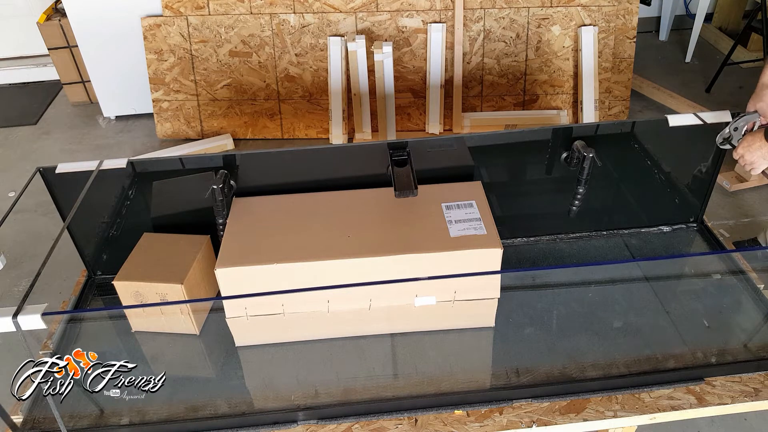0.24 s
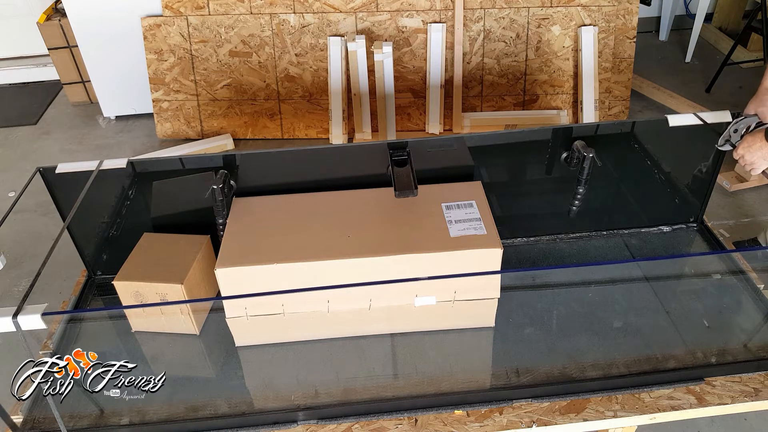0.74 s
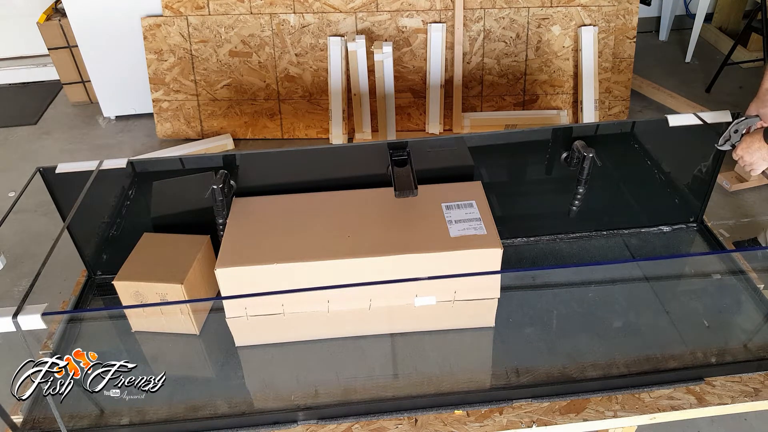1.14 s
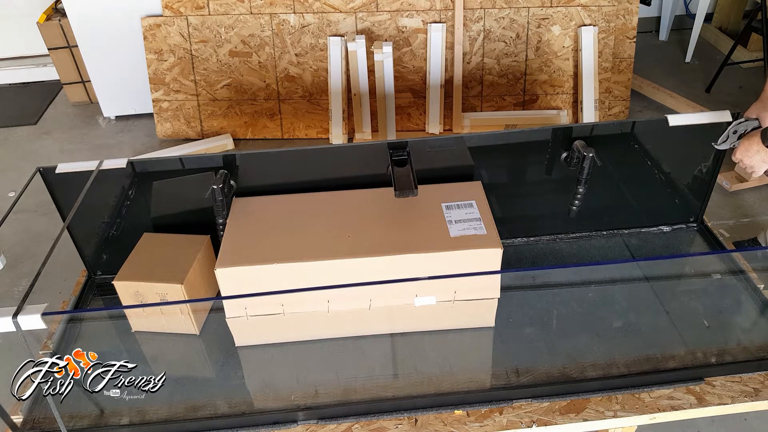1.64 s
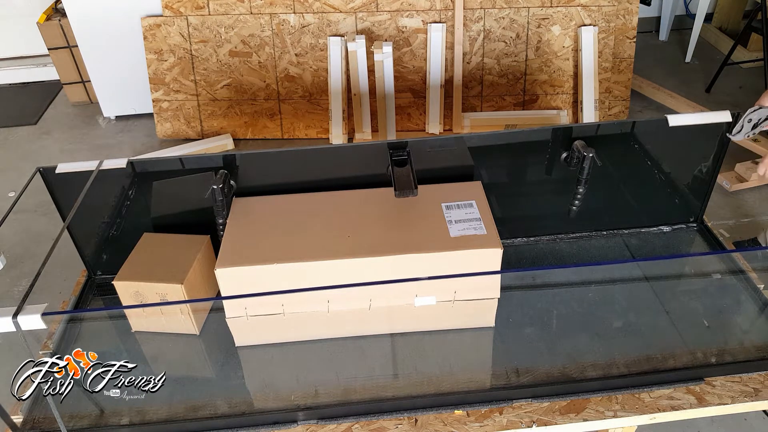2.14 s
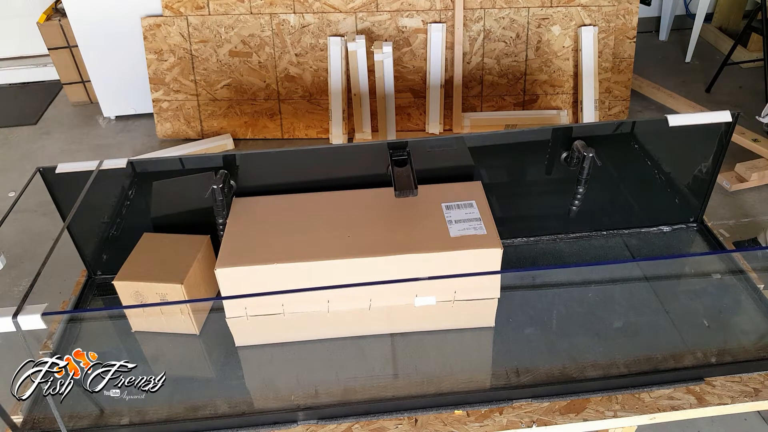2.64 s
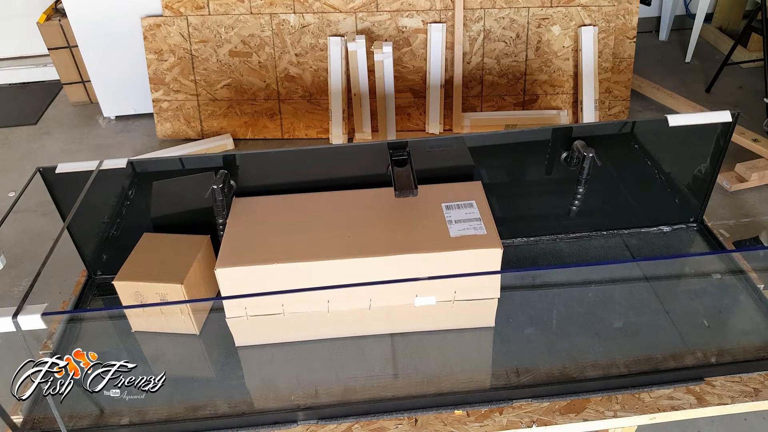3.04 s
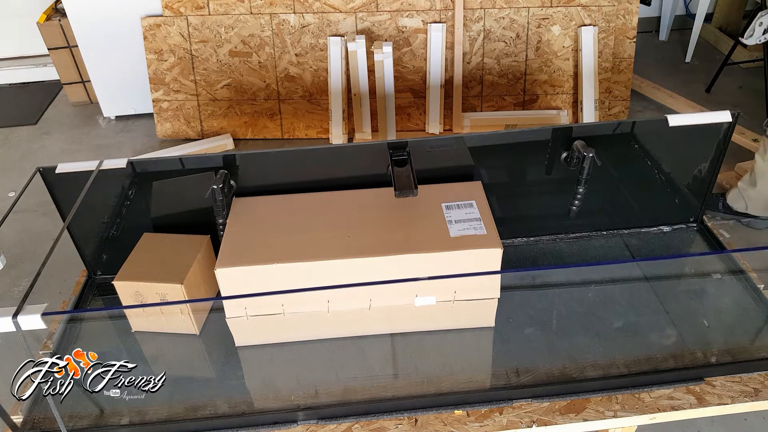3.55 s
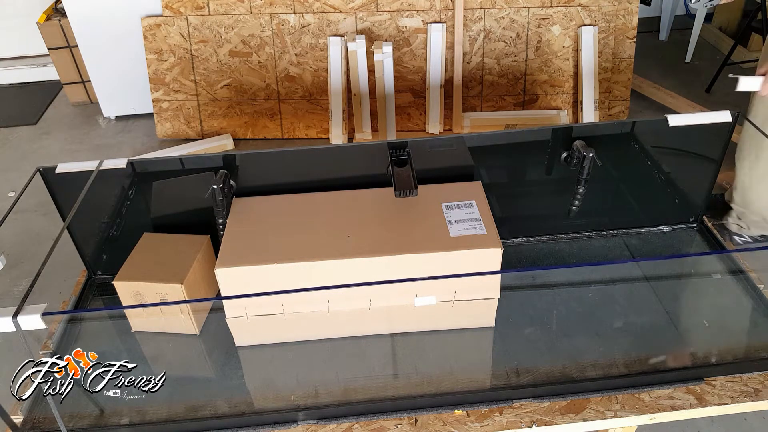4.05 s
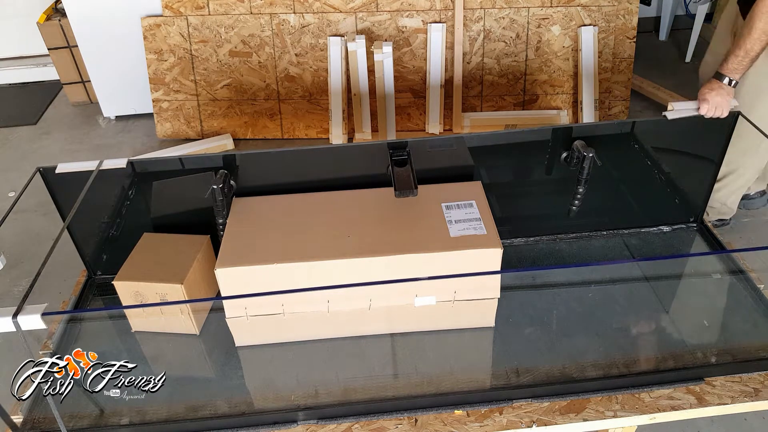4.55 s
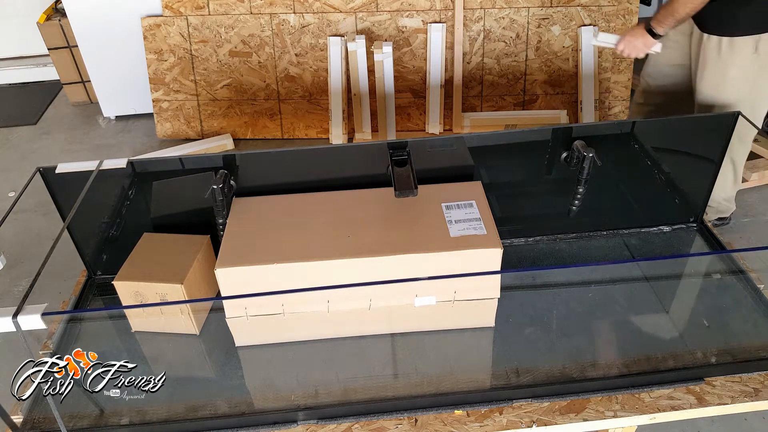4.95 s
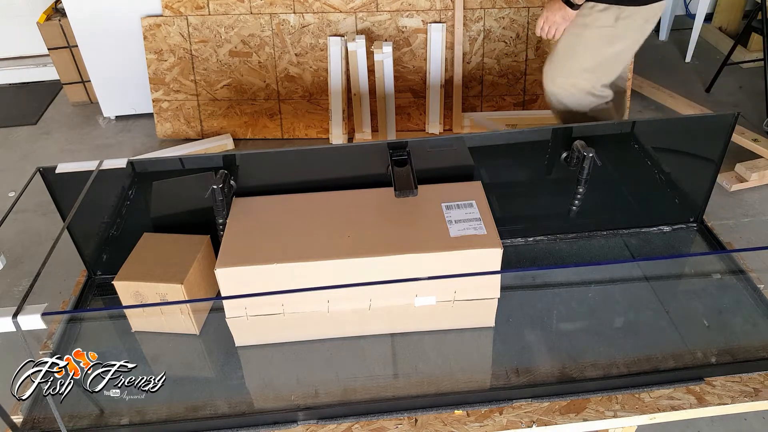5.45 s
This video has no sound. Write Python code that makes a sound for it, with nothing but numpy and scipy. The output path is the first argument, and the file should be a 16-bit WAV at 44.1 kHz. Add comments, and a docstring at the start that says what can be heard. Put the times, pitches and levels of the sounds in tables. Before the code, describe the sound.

In a garage with faint hum and short reverberation, a hand tool makes three sharp, steely snaps about half a second apart. A large panel then cracks and booms onto the floor slightly right, bouncing quickly and ringing low. Faint shoe and cloth scuffs, gritty ticks and dull knocks follow, before a small board lands with a hard, ringing clatter. Stereo microphone at moderate distance.

```python
"""A hand tool snaps three times on wooden boards in a garage, over still air and mains hum.
Then a big panel drops, a little to the right: noise bursts crack and boom, bending modes ring on.
Shoes and clothes scuff as shaped noise, sharp ticks and grit speckle it, and dull knocks follow.
A small board is thrown down and clatters on the concrete: softened bursts with a ring of its own.
Bands of decaying noise give the contacts the room's reverberation."""
import sys
import numpy as np
from scipy import signal
from scipy.fft import rfft, irfft, next_fast_len
from scipy.io import wavfile
from scipy.ndimage import uniform_filter1d

SR = 44100
rng = np.random.default_rng(int(sys.argv[2]) if len(sys.argv) > 2 else 0)


def generate_wav(sig):
    """Save sig (samples, or channels by samples) to the path in sys.argv[1] as 16-bit PCM at SR."""
    pcm = np.round(np.clip(np.atleast_2d(sig).T, -1, 1) * 32767).astype(np.int16)
    wavfile.write(sys.argv[1], SR, pcm)


N = 250488
T = np.arange(N) / SR  # seconds

# Contact levels are set ahead of the garage's direct and room gains; colours and rings are relative.
# Tool snaps: t/s, level/dB, dry thump/dB and wood ring/dB (both relative to the level),
# spring-back level/dB, then low, middle and top ring f/Hz as the grip shifts.
TOOL_SNAPS = [(0.1675, -18.5, -35.5, -16, -42, 4530, 8410, 11300),
              (0.593, -19, -21.5, -36.5, -45.5, 5310, 8010, 11740),
              (1.0323, -17.5, -30.5, -21, -61, 4566, 8010, 11730)]
# Colour of the tool's rasp: f/Hz, level/dB
RASP_COLOUR = [(60, -33.5), (130, -13), (220, -14), (600, -19.5), (2000, -10), (3200, -7.5), (4300, -3),
               (7000, -5), (10500, -1.5), (12000, 1), (13500, -3), (16000, -8)]
# Steady rings of the tool's steel: f/Hz, level/dB
STEEL_RINGS = [(2850, -14.5), (3850, -8), (4400, -10), (5150, -7), (5750, -12), (7000, -7), (9350, -3.5),
               (11750, 2), (12150, -1.5), (12700, -3), (13350, -9), (14600, -4.5)]
# Low, middle and top steel ring that shift with the grip: level/dB
GRIP_RING_LEVELS = [-3, 1, 5.5]
# Rings of the wood under the tool: f/Hz, level/dB, t60/s
WOOD_UNDER_TOOL = [(950, 1, .04), (1099, -6.5, 0.04), (1830, -3, .03)]
# Colour of the tool's thump through the wood: f/Hz, level/dB
TOOL_THUMP_COLOUR = [(40, -16), (130, 2), (700, -2), (2000, -3), (6000, -32.5)]
SPRING_BACK_S = .217  # from each snap to the tool's spring-back

# The panel lands and rebounds: t/s, boom level/dB, crack level/dB
PANEL_LANDINGS = [(1.6649, -24, -7.5), (1.671, -5, -23), (1.696, -13.5, -19.5), (1.712, -11, -21),
                  (1.745, -14, -20.5), (1.764, -13.5, -27), (1.781, -22, -24.5)]
# Bending modes of the panel: f/Hz, level/dB, t60/s
PANEL_BENDING = [(81, -18, 1.0), (129.4, -12, 0.39), (163.6, -7.5, 0.11), (183.9, 1, 0.71),
                 (214.5, -3.5, 0.37), (268.6, -6, 0.68), (324.5, -5, 0.37), (369.7, -12, 0.57),
                 (428, -8.5, 0.6), (479, -5.5, 0.25), (505, -11.5, 0.54), (595, -16.5, .34),
                 (660, -13.5, 0.69), (770, -12, 0.33)]
# Colour of the panel's boom: f/Hz, level/dB
BOOM_COLOUR = [(30, -32), (62, -30.5), (100, -16), (140, -2.5), (190, -5), (280, 1.5), (380, -2), (520, -3),
               (800, -6.5), (1100, -5.5), (1600, -23), (4000, -30.5), (16000, -56.5)]
# Colour of the panel's crack: f/Hz, level/dB
CRACK_COLOUR = [(100, -34), (300, -10), (750, -1.5), (1600, 1), (2200, -1), (3000, 3.5), (5000, -6.5),
                (7300, -11.5), (8700, -5.5), (10300, -14.5), (16000, -18.5)]

# Early knock, landing, close echoes and rattle of the board: t/s, level/dB, brightness (low-pass) f/Hz
BOARD_BURSTS = [(4.702, -39.5, 4400), (5.567, -26.5, 1700), (5.5741, -14, 1420), (5.5795, -7, 2410),
                (5.5850, -20, 9000), (5.5924, -19, 6600), (5.614, -14.5, 2980), (5.646, -15.5, 3880)]
# Colour of the board's clatter: f/Hz, level/dB
CLATTER_COLOUR = [(60, -38), (200, -24.5), (380, -20), (600, -9), (900, -4.5), (1250, 2), (1550, -7.5),
                  (2200, 5.5), (3000, -6), (5500, -5.5), (8500, -1), (10500, -9.5), (16000, -4)]
# Ringing modes of the board: f/Hz, level/dB, t60/s
BOARD_RINGS = [(604, -6, 0.78), (870, -6.5, 0.83), (1250, -43, 0.46), (1905, -2, 0.68), (2251, 4.5, 0.17),
               (2314, 9, 0.28), (2460, -5.5, 1)]

# Footfalls and dull knocks: t/s, level/dB, brightness (low-pass) f/Hz
DULL_KNOCKS = [(2.63, -46.5, 449), (3.13, -47, 1020), (3.57, -52.5, 392), (4.18, -46.5, 2040),
               (4.371, -42.5, 1030), (4.425, -30, 4050), (4.433, -28.5, 2330), (4.563, -35, 2280),
               (4.601, -37.5, 680), (4.63, -38.5, 264), (5.105, -49.5, 620), (5.287, -47.5, 840),
               (5.446, -50, 950)]
# Colour of the knocks: f/Hz, level/dB
DULL_COLOUR = [(50, -25), (110, -6.5), (180, -2), (350, -0.5), (750, -4), (1800, -3.5), (2250, -2),
               (2550, -16), (3000, -4), (3600, -10.5), (7000, -19), (16000, -28)]
KNOCK_RING_SHARE = 0.687  # a harder contact rings higher: ring pitch as a share of its brightness

# Sharp ticks: t/s, level/dB, centre f/Hz
SHARP_TICKS = [(0.065, -49, 3960), (3.262, -57, 10500), (3.533, -53, 7900), (3.5825, -37, 10100),
               (3.691, -49, 7000), (3.922, -41.5, 4500), (4.701, -43.5, 10630)]
# Faint grit while the feet shift: mean level and centre pitch, each tick varies around them
GRIT_PER_S, GRIT_DB, GRIT_HZ = 6.3, -64, 6000
GRIT_FROM_S, GRIT_TO_S = 2.42, 3.5

# Strokes of shoes and clothes: t/s, swell/s, fade/(dB per s), rub level/dB, gritty hiss level/dB
SCUFF_STROKES = [(2.58, .02, 37, -69.5, -74), (3.07, 0.067, 40.5, -55.5, -62.5),
                 (3.34, .06, 58, -61.5, -76), (3.5, 0.013, 45, -61, -67), (3.578, 0.0073, 48, -54, -57.5),
                 (3.915, .006, 53.5, -46.5, -49.5), (4.025, 0.0063, 126, -52, -49),
                 (4.17, 0.067, 132, -49, -54.5), (4.42, 0.0035, 120, -47.5, -61),
                 (4.55, 0.018, 48, -55, -60.5)]
# Colour of rubbing cloth and soles: f/Hz, level/dB
CLOTH_COLOUR = [(300, -12.5), (800, -2.5), (1600, -1), (2800, 4.5), (4000, -6), (6000, -20.5),
                (16000, -44.5)]
# Colour of the gritty hiss: f/Hz, level/dB
GRIT_HISS_COLOUR = [(1500, -22), (4000, 2), (5200, 0), (7000, -3.5), (8500, 2.5), (10300, -8),
                    (13000, -6.5), (16000, -13)]
SCUFF_LENGTH_S, SCUFF_LIFT_S = 0.24, 0.13  # a stroke presses this long, then lifts over this time
SLIDE_S, SLIDE_DB = 1.845, -42.5  # the panel settles in short slides, starting here
SLIDE_GAP_S, SLIDE_GAP_SHARE, SLIDE_LOSS_DB = 0.22, 0.52, 13.5  # each comes sooner and weaker
SLIDE_SWELL_S, SLIDE_FADE_DB_PER_S = 0.031, 85

# Colour of the still air: f/Hz, level/dB
AIR_COLOUR = [(25, -29.5), (45, -15.5), (62, -14.5), (95, -13), (125, -8.5), (200, -12), (400, -15.5),
              (500, -14), (800, -22.5), (1300, -27.5), (3300, -35.5), (6500, -42), (8500, -40),
              (16000, -52.5)]
AIR_DB = -57
# Mains hum: f/Hz, level/dB (RMS)
MAINS_HUM = [(120, -60)]

# Reverberation bands of the garage: f/Hz, t60/s, left-right likeness (0 unrelated, 1 identical)
GARAGE_BANDS = [(60, 0.37, .8), (178, 0.76, 0.95), (444, 0.4, 0.75), (1110, 0.52, 0), (3000, 0.45, .05),
                (6000, 0.46, 0.0044), (9860, 0.3, 0.087), (16000, 0.18, 0)]
LATE_DB, LATE_STRETCH = -24, 3.8  # the far corners ring on, weakly and longer
CUTOFF_HZ = 16000


def tool(echo_s=.0052, echo_db=1, lead_s=.0024, lead_db=-19, rasp_db=-4.0, steel_db=-4.0,
         steel_t60=0.024, vary_db=3.6, spring_hz=3500, spring_wood_db=-9, thump_late_s=.0013):
    """A short slip, then a sharp snap and its echo off the ceiling ring the steel; it springs back softly."""
    out, thumps = np.zeros(N), np.zeros(N)
    wood = ring(WOOD_UNDER_TOOL, size=8192)
    thump = as_blow(colour(signal.unit_impulse(8192), TOOL_THUMP_COLOUR))
    slip_snap_echo = ((-lead_s, lead_db), (0, 0), (echo_s, echo_db))
    for s, db, thump_db, wood_db, spring_db, *grip_hz in TOOL_SNAPS:
        rings = STEEL_RINGS + list(zip(grip_hz, GRIP_RING_LEVELS))
        for delay, part_db in slip_snap_echo:
            # each part rings with slightly different pitches and levels
            detune = 1 + rng.normal(0, .005, len(rings))
            steel_modes = [(hz * shift, ring_db + vary_db * rng.normal(), steel_t60)
                           for (hz, ring_db), shift in zip(rings, detune)]
            steel = from_db(steel_db) * ring(steel_modes, size=8192)
            rasp = from_db(rasp_db) * burst(RASP_COLOUR, t60=0.02)
            add(out, s + delay, from_db(db + part_db) * (rasp + steel))
        add(out, s, from_db(db + wood_db) * wood)
        add(thumps, s + thump_late_s, from_db(db + thump_db) * thump)
        spring = as_blow(soften(burst(RASP_COLOUR, t60=0.05), spring_hz))
        add(out, s + SPRING_BACK_S, from_db(spring_db) * (spring + from_db(spring_wood_db) * wood))
    # the thumps stay dry and centred
    return garage(out, direct_db=-4.0, room_db=-0.5, pan_db=-5.5, lag_s=.00016) + thumps


def panel(ring_db=-4, swell_s=0.022):
    """The edge cracks on the floor, the sheet slaps down after it and booms in its bending modes."""
    hits, modes = np.zeros(N), np.zeros(N)
    for s, boom_db, crack_db in PANEL_LANDINGS:
        boom = from_db(boom_db) * burst(BOOM_COLOUR, t60=0.048)
        crack = from_db(crack_db) * burst(CRACK_COLOUR, t60=0.02)
        add(hits, s, boom + crack)
    bending = ring(PANEL_BENDING)
    swell = 1 - np.exp(-T[:len(bending)] / swell_s)
    add(modes, PANEL_LANDINGS[0][0], from_db(ring_db) * as_blow(bending * swell))
    return (garage(hits, direct_db=-6.5, room_db=-2.5, pan_db=-5.5, lag_s=.00011)
            + garage(modes, direct_db=-2.0, room_db=-21.5, pan_db=0.1, lag_s=0.00027))


def board(ring_db=-4):
    """A light early knock, then the board lands with close echoes and rattles; its modes ring on."""
    hits, modes = np.zeros(N), np.zeros(N)
    for s, db, bright_hz in BOARD_BURSTS:
        contact = soften(burst(CLATTER_COLOUR, t60=0.016), bright_hz)
        add(hits, s, from_db(db) * as_blow(contact))
    # the ring starts with the loudest burst
    s, db, _ = max(BOARD_BURSTS, key=lambda hit: hit[1])
    add(modes, s, from_db(db + ring_db) * ring(BOARD_RINGS))
    return (garage(hits, direct_db=-6.5, room_db=3.5, pan_db=-3.5, lag_s=.00007)
            + garage(modes, direct_db=-3.5, room_db=-6, pan_db=-16.5, lag_s=.00009))


def knocks(ring_db=4, ring_q=4):
    """Soft contacts of shoes and wood, each with one short hollow ring."""
    out = np.zeros(N)
    for s, db, bright_hz in DULL_KNOCKS:
        knock = soften(burst(DULL_COLOUR, t60=0.053), bright_hz)
        ring_hz = KNOCK_RING_SHARE * bright_hz
        hollow = from_db(ring_db) * resonate(knock, ring_hz, ring_hz / ring_q)
        add(out, s, from_db(db) * as_blow(knock + hollow))
    return garage(out, direct_db=-5, room_db=2.5, pan_db=-6.0, lag_s=.00011)


def scuffs(slide_rub_db=-2, pan_db=-3.0, count=3):
    """Cloth and soles rub, and grit hisses under them and under the sliding panel."""
    strokes = [(stroke(s, swell_s, fade), rub_db, hiss_db)
               for s, swell_s, fade, rub_db, hiss_db in SCUFF_STROKES]
    s = SLIDE_S
    for k in range(count):
        db = SLIDE_DB - k * SLIDE_LOSS_DB
        slide = stroke(s, SLIDE_SWELL_S, SLIDE_FADE_DB_PER_S)
        strokes.append((slide, db + slide_rub_db, db))
        s += SLIDE_GAP_S * SLIDE_GAP_SHARE ** k
    shapes, rub, hiss = zip(*strokes)
    rubbing = friction(zip(shapes, rub), CLOTH_COLOUR, grain_db=5.5)
    hissing = friction(zip(shapes, hiss), GRIT_HISS_COLOUR, grain_db=4.5)
    return (rubbing + hissing) * from_db([[pan_db / 2], [-pan_db / 2]])


def stroke(s, swell_s, fade_db_per_s):
    """Pressure of one rubbing stroke: it swells, fades, and ends as the contact lifts."""
    age = T - s
    swell = np.clip(age / swell_s, 0, 1)
    fade = from_db(-fade_db_per_s * np.maximum(age - swell_s, 0))
    lift = np.clip((SCUFF_LENGTH_S + SCUFF_LIFT_S - age) / SCUFF_LIFT_S, 0, 1)
    return swell * fade * lift


def friction(strokes, spectrum, grain_db, catch_db=1.0):
    """Dense tiny slips of uneven size, bunched where the surfaces catch; strokes are (pressure, dB)."""
    catches = rms_one(soften(rng.standard_normal(N), 44.4))
    slip_size = from_db(grain_db * rng.standard_normal(N) + catch_db * catches)
    slips = rng.standard_normal((2, N)) * slip_size
    # overlapping strokes add in power
    pressure = np.sqrt(sum((from_db(db) * shape) ** 2 for shape, db in strokes))
    return rms_one(colour(slips, spectrum)) * pressure


def ticks(spread=1.9, skirt_db=-11, vary_db=3):
    """Tiny hard contacts, each with one broad peak: a few sharp ones and a scatter of grit."""
    out = np.zeros(N)
    slots = np.arange(GRIT_FROM_S, GRIT_TO_S, 1 / GRIT_PER_S)
    # each slot's tick strays in time, level and pitch
    grit = [(s + late / GRIT_PER_S, GRIT_DB + vary_db * size, GRIT_HZ * 2 ** octaves)
            for s, (late, size, octaves) in zip(slots, rng.uniform(-.5, .5, (64, 3)))]
    for s, db, hz in SHARP_TICKS + grit:
        peak = [(hz / 10, 2 * skirt_db), (hz, 0), (hz * spread, skirt_db)]
        add(out, s, from_db(db) * burst(peak, t60=.014))
    return garage(out, direct_db=-10, room_db=-7.5, pan_db=-8.5, lag_s=.00018)


def background():
    """Still air as coloured stereo noise, and a steady mains hum as a sine."""
    air = from_db(AIR_DB) * rms_one(colour(sum(diffuse_bands(N)), AIR_COLOUR))
    hum = sum(from_db(db) * np.sqrt(2) * np.sin(2 * np.pi * (hz * T + rng.random()))
              for hz, db in MAINS_HUM)
    return air + hum


def garage(x, direct_db, room_db, pan_db, lag_s, build_s=0.0017, room_pan_share=0.4, size=SR):
    """The direct sound reaches the right side first; reverberation builds up and dies band by band."""
    tail = 0
    for band, (hz, t60, _) in zip(diffuse_bands(size), GARAGE_BANDS):
        late = from_db(LATE_DB) * dying(t60 * LATE_STRETCH, size) / (1 + hz / 1500)
        tail = tail + band * (dying(t60, size) + late)
    build = 1 - np.exp(-T[:size] / build_s)
    # both fades bring the end of the tail to silence
    end_fade = np.clip(np.linspace(5, 0, size), 0, 1) ** 2
    slow_fade = np.linspace(1, 0, size) ** .25
    tail = even(tail, width_hz=90) * end_fade * build * slow_fade / np.sqrt(.04 * SR)
    pan = np.array([[pan_db], [-pan_db]]) / 2  # negative leans right
    direct = np.array([np.roll(x, round(lag_s * SR)), x])
    wet = signal.fftconvolve(x[None], tail, axes=1)[:, :N]
    return from_db(direct_db + pan) * direct + from_db(room_db + room_pan_share * pan) * wet


def diffuse_bands(size):
    """Stereo noise split into the garage's bands, with the left-right likeness set by pitch."""
    centres, _, likeness = np.transpose(GARAGE_BANDS)
    pitch = np.log(np.fft.rfftfreq(size, 1 / SR) + 1)
    alike = np.clip(np.interp(pitch, np.log(centres), likeness), -1, 1)
    mid, side = np.exp(2j * np.pi * rng.random((2, len(pitch)))) * np.sqrt(size / 2)
    both = np.sqrt(1 + alike) * mid + np.sqrt(1 - alike) * side * [[1], [-1]]
    # neighbouring bands crossfade on a log-frequency scale
    return [irfft(both * np.interp(pitch, np.log(centres), share), size)
            for share in np.eye(len(centres))]


def burst(spectrum, t60, size=8192):
    """A contact excites countless close modes that die together."""
    noise = even(rng.standard_normal(size) * dying(t60, size), width_hz=360)
    return as_blow(colour(noise * dying(10 * t60, size), spectrum))


def ring(modes, size=SR):
    """The few strong modes that outlast a contact, as decaying sines of alternating polarity."""
    total = np.zeros(size)
    for k, (hz, db, t60) in enumerate(modes):
        sine = np.sin(2 * np.pi * hz * T[:size])
        total += (-1) ** k * from_db(db) * dying(t60, size) * sine
    return as_blow(total)


def resonate(x, hz, width_hz):
    """One resonance, gain 1 at its top."""
    return signal.lfilter(*signal.iirpeak(min(hz, .45 * SR), hz / width_hz, fs=SR), x)


def soften(x, hz, kind="low", order=2):
    """A gentle low- or high-pass."""
    return signal.sosfilt(signal.butter(order, min(hz, .45 * SR), kind, fs=SR, output="sos"), x)


def colour(x, spectrum):
    """Causal (minimum-phase) filter with the given spectrum."""
    size = 2 * next_fast_len(x.shape[-1])
    hz, db = np.transpose(spectrum)
    pitch = np.log(np.fft.rfftfreq(size, 1 / SR) + 1)
    log_gain = np.log(from_db(np.interp(pitch, np.log(hz), db)))
    # folding the cepstrum onto positive time gives the minimum phase
    cepstrum = irfft(log_gain)[:size // 2]
    response = np.exp(2 * rfft(cepstrum, size) - cepstrum[0])
    return irfft(rfft(x, size) * response)[..., :x.shape[-1]]


def even(x, width_hz):
    """Level a noise's spectrum over the given width, keeping its energy and its fine grain."""
    spectrum = rfft(x)
    width_bins = max(1, round(width_hz * x.shape[-1] / SR))
    power = uniform_filter1d(np.abs(spectrum) ** 2, width_bins)
    return irfft(spectrum * np.sqrt(power.mean() / (np.abs(power) + 1e-12)), x.shape[-1])


def dying(t60, size):
    """An envelope that loses 60 dB in t60."""
    return 1000 ** (-T[:size] / t60)


def as_blow(x):
    """Scale to the energy of 10 ms at full level."""
    return x * np.sqrt(.01 * SR / np.sum(x ** 2))


def rms_one(x):
    """Scale to an RMS level of 1."""
    return x / np.sqrt(np.mean(x ** 2) + 1e-20)


def from_db(db):
    """Turn decibels into an amplitude gain."""
    return 10 ** (np.asarray(db) / 20)


def add(out, s, sound):
    """Mix a sound in at time s."""
    start = round(s * SR)
    out[start:start + len(sound)] += sound[:N - start]


def scene():
    """Tool, panel and board up front, small contacts around them, air and hum behind."""
    return tool() + panel() + board() + knocks() + scuffs() + ticks() + background()


def record(dry):
    """The microphone sheds the deepest bass, peaks stop at full scale, the top is cut."""
    heard = np.clip(soften(dry, 32, "high"), -1, 1)
    return signal.sosfilt(signal.ellip(10, .2, 90, CUTOFF_HZ, fs=SR, output="sos"), heard)


dry = scene()
out = record(dry)
generate_wav(out)
```